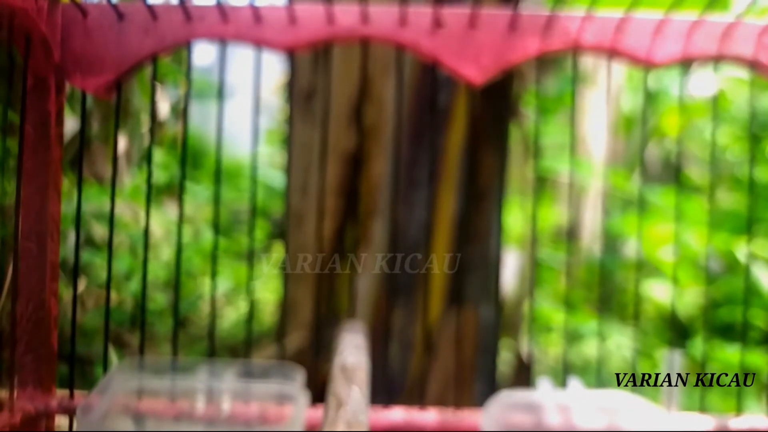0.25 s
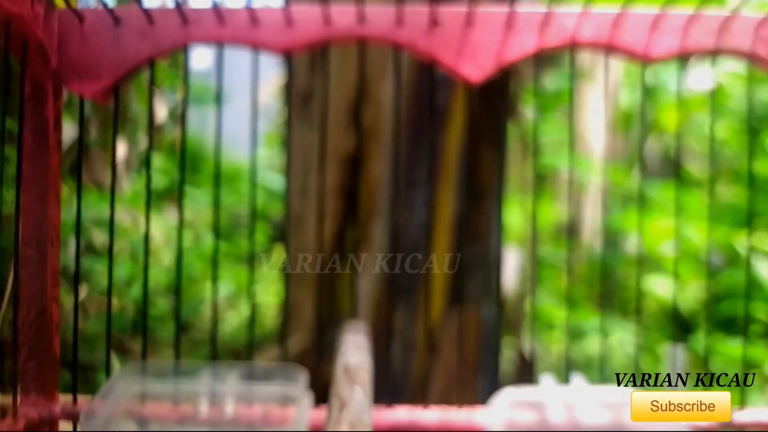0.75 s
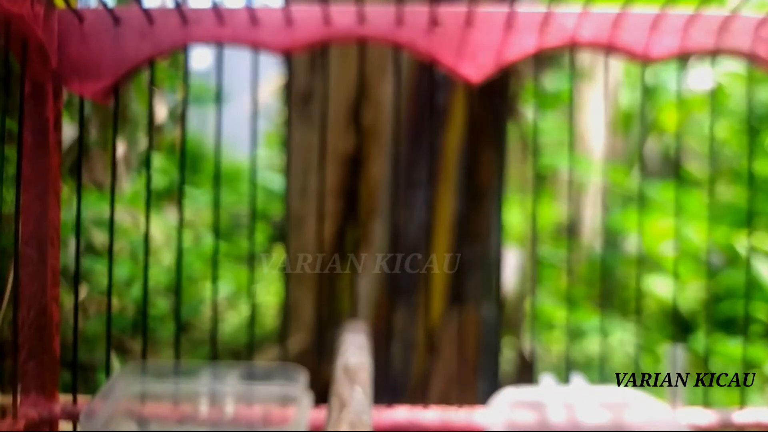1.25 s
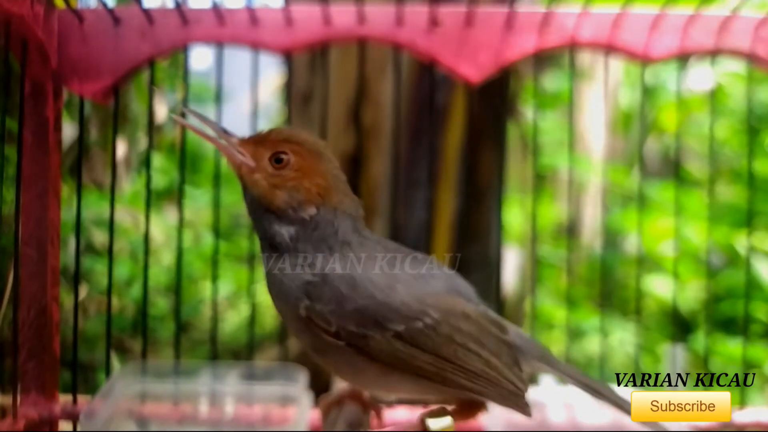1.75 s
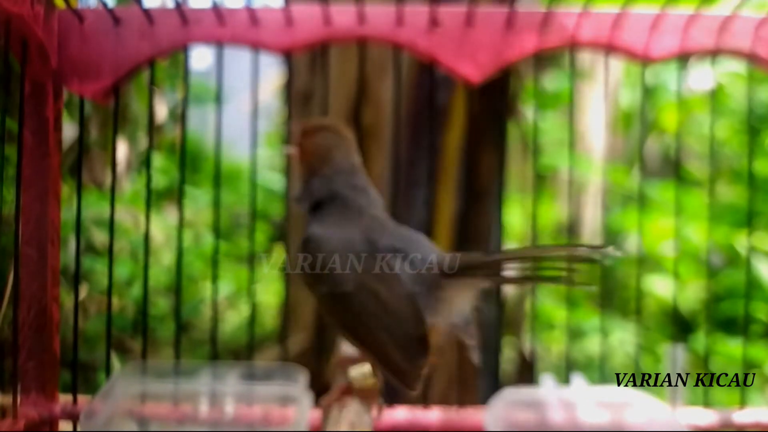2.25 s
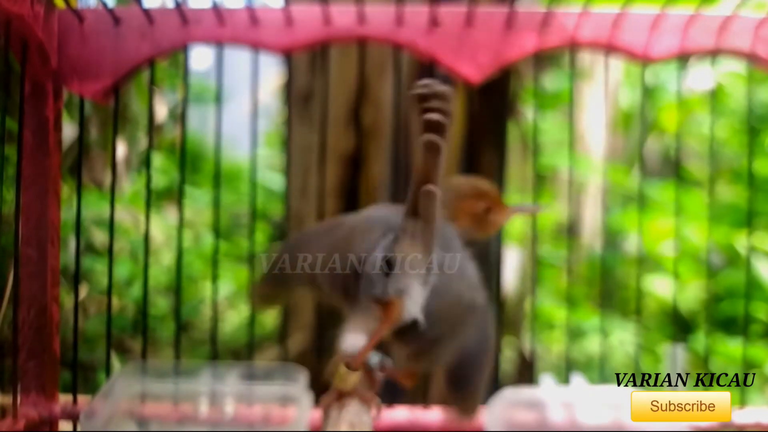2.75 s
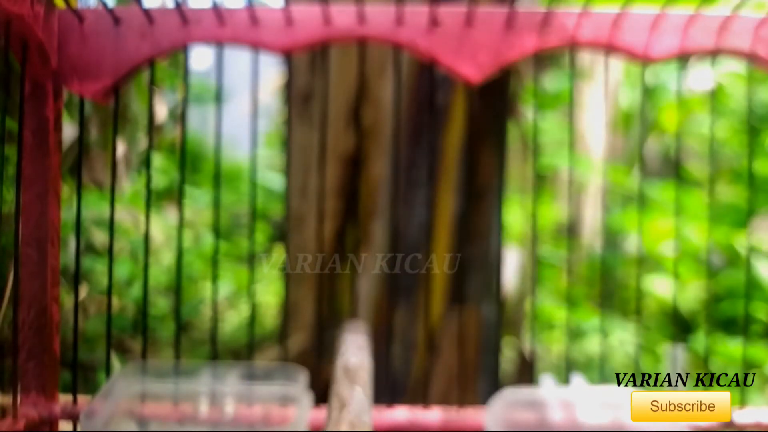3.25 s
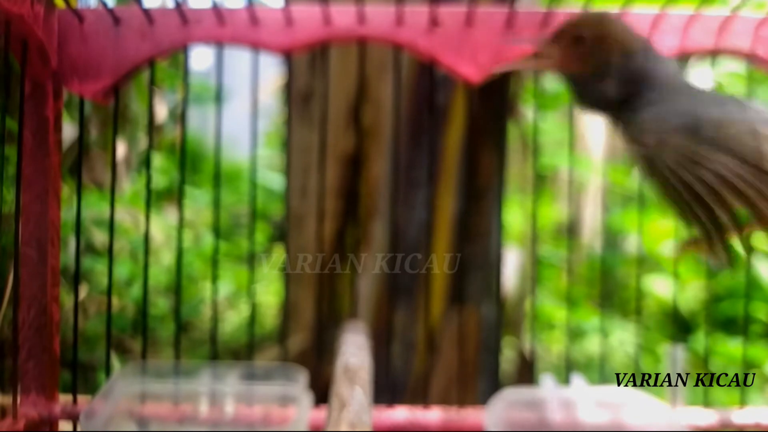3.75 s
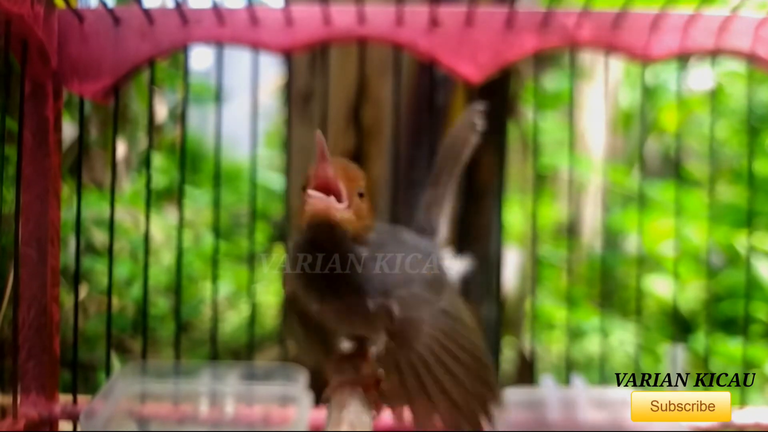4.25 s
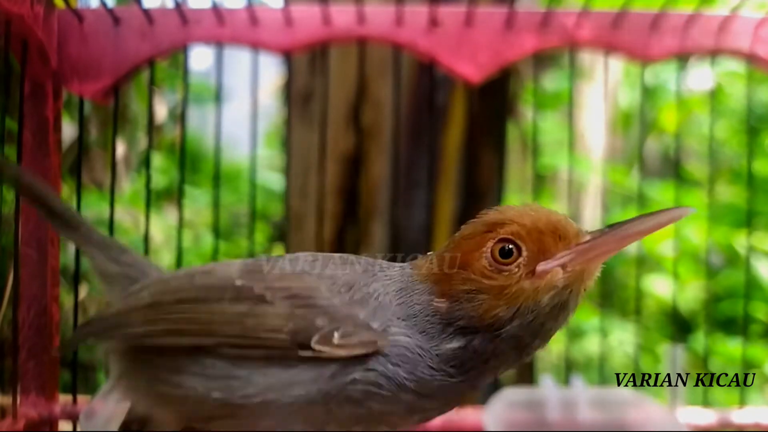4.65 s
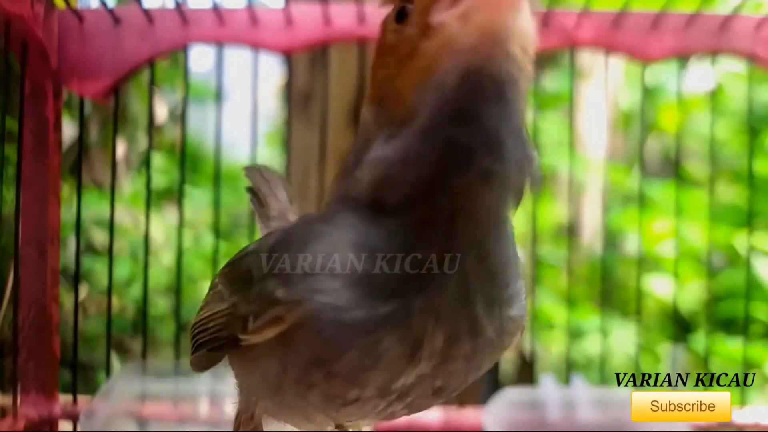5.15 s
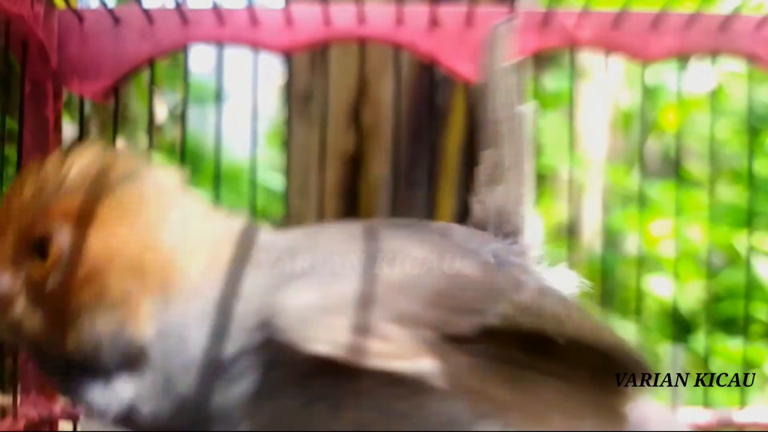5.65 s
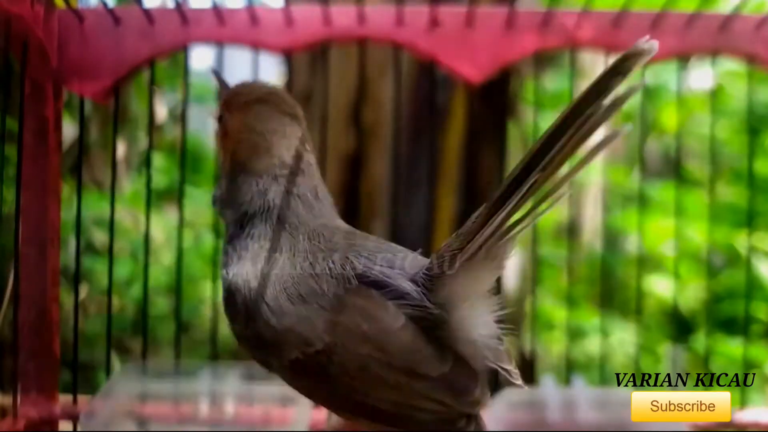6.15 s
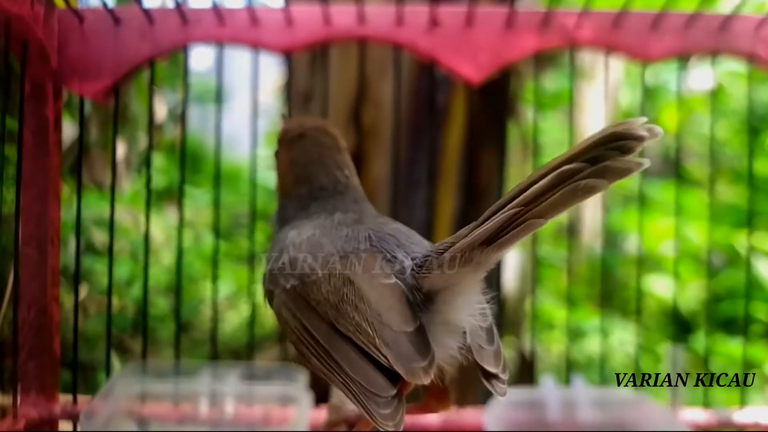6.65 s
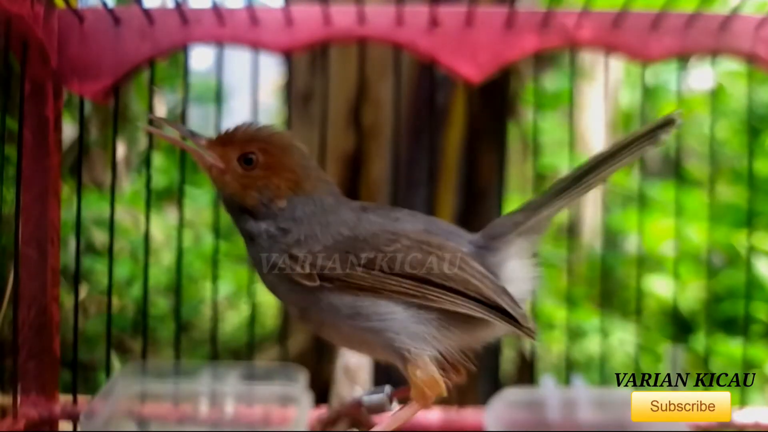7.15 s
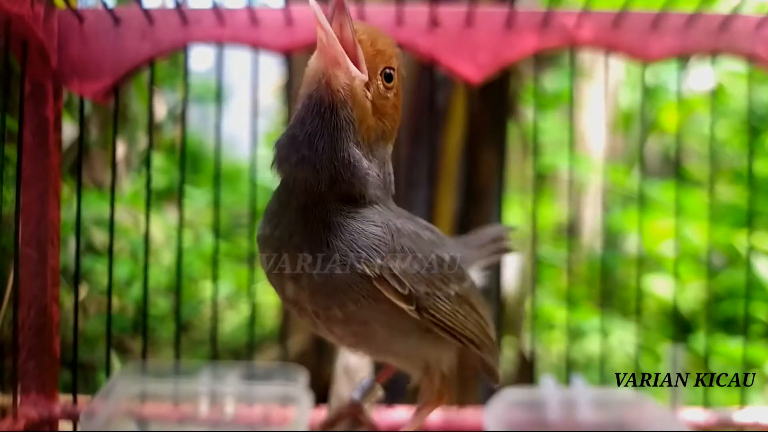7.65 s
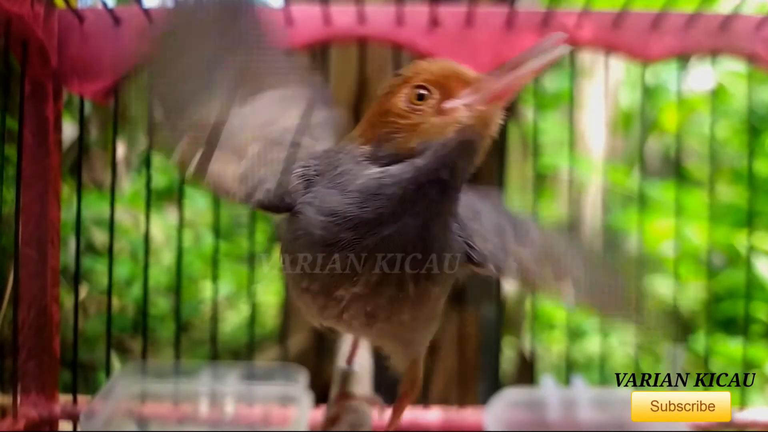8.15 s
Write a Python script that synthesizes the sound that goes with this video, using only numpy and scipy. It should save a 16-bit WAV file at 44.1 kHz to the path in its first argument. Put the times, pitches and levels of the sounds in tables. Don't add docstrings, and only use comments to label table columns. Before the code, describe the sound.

A small caged bird close by repeats a loud, piercing three-note whistle about once a second, while fainter birds answer over a low distant engine throb.

```python
import sys
import numpy as np
from scipy import signal
from scipy.fft import rfft, irfft, next_fast_len
from scipy.io import wavfile
from scipy.ndimage import uniform_filter1d, map_coordinates

SR = 44100
rng = np.random.default_rng(int(sys.argv[2]) if len(sys.argv) > 2 else 0)


def ratio(d):
    e = np.asarray(d, float) / 20
    return 10 ** e


def transcribe(signal):
    frames = np.atleast_2d(signal).T
    limited = np.clip(frames, -1, 1)
    pcm = np.round(limited * 32767).astype(np.int16)
    wavfile.write(sys.argv[1], SR, pcm)


N = 369999

# time_ms from the anchor, pitch_hz, level_db
RISE_SHAPE = [(-10, 1500, -40.5), (-6.5, 2040, -11), (-5.5, 2200, -7), (0, 2710, -4), (7, 3100, 1),
              (11, 3380, 4), (14.5, 3480, -3.5), (14, 5400, -42.5)]
WHISTLE_SHAPE = [(-12, 4500, -40.5), (-8, 4280, 2), (0, 3470, 3.5), (9.5, 2830, -7.5), (21, 2640, -8.5),
                 (40, 2825, -9), (93, 2908, -2.5), (169, 2922, -2.5), (182, 2760, -9)]
VEE_SHAPE = [(-8.5, 4800, -40), (-6.5, 4150, 5), (1, 2850, 1.5), (11.5, 1640, -12.5), (21.5, 1920, -10),
             (44.5, 2650, -0.46), (51, 2700, 0.5), (78.5, 1975, -10.5), (89.5, 1380, -29.5)]
# multiple of the pitch, level_db
OVERTONES_DB = [(2, -1.5), (3, -2.5), (4, -13.5), (5, -0.5)]
# multiple of the pitch, level_db
DOUBLING_DB = [(.5, -56), (1.5, -34.5), (2.5, -47), (3.5, -48), (4.5, -52.5)]


def unit(x):
    return x / np.sqrt(np.mean(x ** 2) + 1e-20)


def along(points, hz):
    f, v = np.transpose(points)
    return np.interp(np.log(hz + 1), np.log(f + 1), v)


def curves(rows):
    s, *cols = np.transpose(rows)
    return [np.interp(np.arange(N) / SR, s, c) for c in cols]


def wobble(rate, count=N):
    coarse = np.arange(0, count + 16, 16)
    knots = rng.standard_normal(int(count * rate / SR) + 5)
    return np.interp(np.arange(count), coarse, map_coordinates(knots, [coarse * rate / SR]))


def coloured(x, spectrum):
    m = next_fast_len(x.shape[-1] + 8192)
    gain = ratio(along(spectrum, np.fft.rfftfreq(m, 1 / SR)))
    return irfft(rfft(x, m) * gain, m)[..., :x.shape[-1]]


def pair(alike):
    a, b = rng.standard_normal((2, N))
    turn = np.arccos(np.clip(alike, -1, 1)) / 2
    return np.array([np.cos(turn) * a + np.sin(turn) * b, np.cos(turn) * a - np.sin(turn) * b])


def patchy(x, patchy_db):
    z = signal.stft(x, nperseg=512)[2]
    field = uniform_filter1d(rng.standard_normal(z.shape[1:]), size=5, axis=0)
    field = uniform_filter1d(field, size=9, axis=1)
    return unit(signal.istft(z * ratio(patchy_db * unit(field)), nperseg=512)[1][:, :N])


def add(track, s, sound):
    i = round(s * SR)
    part = sound[..., max(-i, 0):max(N - i, 0)]
    track[..., max(i, 0):max(i, 0) + part.shape[-1]] += part


def dip(t_ms, centre, half, db):
    return ratio(db * np.exp(-((t_ms - centre) / half) ** 2))


def note(shape, stretch, lead, over_db, waver_db=-0.16, overtones=OVERTONES_DB, halves=DOUBLING_DB,
         lag_ms=0.29, turn=0, release_ms=2.5):
    ms, hz, db = np.transpose(shape)
    ms = np.where(ms > 0, ms * stretch, ms)
    t = np.arange(ms[0], ms[-1], 1000 / SR)
    count = len(t)
    edges = np.clip(np.minimum((t - t[0]) / 2.5, (t[-1] - t) / release_ms), 0, 1)
    level = np.sin(edges * np.pi / 2) ** 2
    level = level * ratio(np.interp(t, ms, db) + waver_db * wobble(110, count))

    aim = uniform_filter1d(np.interp(t, ms, hz), size=90)
    pitch = aim * (1 + 0.0014 * wobble(120, count) + 0.003 * wobble(35, count))
    lead = lead - 2 * np.pi * (pitch - 2900) * lag_ms / 1000
    lead = lead + turn * (np.maximum(t, 45) - 110) / 1000
    phase = 2 * np.pi * np.cumsum(pitch) / SR + np.array([lead / 2, -lead / 2])

    over = 0
    for k, g in overtones:
        swell_db = 3 * wobble(18, count) + 1.5 * wobble(70, count)
        below_limit = np.clip((16000 - k * pitch) / 600, 0, 1)
        partial = np.sin(k * phase + 0.87 * wobble(320, count))
        over = over + ratio(g + over_db + swell_db) * below_limit * partial
    rough = 0.6 * wobble(190, count)
    half = 0
    for k, g in halves:
        half = half + ratio(g + 1.3 * wobble(70, count)) * np.sin(k * phase + rough)
    tone = level * (np.sin(phase) + np.sqrt(level) * (over + half))

    glide = np.abs(np.gradient(aim)) * SR * np.where(t < 120, 1, .6)
    glide = np.maximum(glide - 6000, 0) / 34000.0
    breath = np.sqrt(level) * edges * (.008 + np.minimum(glide, .6) ** 0.33)
    return tone, breath, ms[0] / 1000


def engine():
    # time_s, level_db, firings_per_s
    revs = [(0.0, -49, 19.0), (.3, -53.5, 18.8), (0.8, -55.5, 18.8), (1.05, -45, 20.3), (1.7, -48.5, 20.4),
            (2.05, -45.5, 20.5), (2.75, -51, 19.9), (3.0, -48.5, 20.3), (3.2, -53, 20.7), (3.9, -51, 21.2),
            (4.4, -55.5, 21), (5.0, -53, 23), (5.22, -48.5, 23), (5.7, -52, 20.4), (6.25, -48, 18.4),
            (6.6, -52, 18.4), (7.0, -47, 19.7), (8.39, -49, 20.9)]
    # freq_hz, level_db
    rumble_colour = [(12, -53), (20, -23), (53, -5), (119, -3), (147, -3.5), (219, -18.5), (291, -19.5),
                     (348, -23.5), (422, -31.5), (700, -33.5), (910, -66.5), (1540, -120)]
    pipe_hz, silencer_hz, silencer_db = 89, 119, -5
    throb = 0.53
    db, rate = curves(revs)
    cycles = np.cumsum(rate * (1 + 0.027 * wobble(11.0))) / SR
    fired = np.flatnonzero(np.diff(np.floor(cycles)))
    thumps, t = np.zeros((2, N)), np.arange(SR // 10) / SR
    silencer = ratio(silencer_db - 60 * t / 0.11) * np.sin(2 * np.pi * silencer_hz * t)
    for i, (size, turn, detune) in zip(fired, rng.standard_normal((200, 3))):
        side = 0.64 * turn * np.array([[1], [-1]])
        pipe = np.sin(2 * np.pi * pipe_hz * (1 + 0.045 * detune) * t + side)
        ring = ratio(-60 * t / 0.1) * pipe + silencer
        add(thumps, i / SR, ratio(2.0 * size) * (1 - np.exp(-t / .006)) * ring)
    rumble = unit(coloured(pair(1.0), rumble_colour))
    level = ratio(db + 1.1 * wobble(9.3) + [[1.8], [4.2]])
    return level * (np.sqrt(throb) * unit(thumps) + np.sqrt(1 - throb) * rumble)


def wings_and_yard():
    # start_s (middle), level_db over the leaves, half_length_s
    flurries = [(0.1, 5.5, 0.42), (0.957, 9.5, 0.056), (1.204, 3, 0.095), (2.067, 10.5, 0.044),
                (2.998, 10, 0.078), (3.598, 3.5, 0.16), (4.25, 0, 0.089), (4.824, 5.5, 0.16),
                (5.185, 10.5, 0.14), (5.827, 10, 0.13), (6.214, 6, 0.063), (7.299, 5, 0.32),
                (7.665, 4, 0.2), (8.146, 3.5, 0.29)]
    # freq_hz, level_db
    feathers = [(180, -33), (300, -7), (379, -8), (1480, -24), (1640, -30), (2070, -18), (10700, -21.5),
                (16000, -32)]
    # freq_hz, level_db
    yard = [(88, -30), (150, -3.5), (204, -16.5), (463, -26), (583, -33), (819, -25.5), (1410, -31),
            (2610, -30), (6000, -46), (7800, -77), (13200, -120)]
    leaves_db, yard_db = -77, -58.5
    t = np.arange(N) / SR
    db = leaves_db + sum(g * np.exp(-((t - s) / half) ** 2) for s, g, half in flurries)
    level = ratio(db + 11.0 + 2.2 * wobble(45) + 1.1 * wobble(5.5))
    rustle = level * patchy(coloured(pair(0.098), feathers), patchy_db=3.5)
    wash = ratio(yard_db + 0.5 + 0.83 * wobble(8.8)) * unit(coloured(pair(0.29), yard))
    return rustle + wash


def neighbour():
    # start_s of the whistle, rise_db, whistle_db, flourish_db, flourish_delay_s
    answers = [
        (-.205, -42, -63.5, -58, 0.23),
        (.812, -76, -64.5, -45.5, .25),
        (3.250, -51, -45, -52, 0.21),
        (4.688, -46.5, -46.5, -47, .226),
        (7.117, -52, -44.5, -55.5, 0.22),
    ]
    paces = [0.98, 0.94, 0.91, 0.67, .96]
    out = np.zeros((2, N))
    for (s, rise_db, whistle_db, vee_db, vee_s), pace in zip(answers, paces):
        # (centre ms, half width ms, dB)
        phrase = ((RISE_SHAPE, -.046, rise_db + 1.5, .89, (45, 22, 0)),
                  (WHISTLE_SHAPE, 0, whistle_db - 4, .92, (45, 22, -10)),
                  (VEE_SHAPE, vee_s, vee_db + 3, pace, (0, 12, -6)))
        for shape, late, db, stretch, hollow in phrase:
            tone, _, start = note(shape, stretch, lead=2.2, over_db=-27.5, waver_db=4.0,
                                  overtones=OVERTONES_DB[:1], halves=[])
            t_ms = 1000 * (start + np.arange(tone.shape[1]) / SR)
            add(out, s + late + start, ratio(db) * dip(t_ms, *hollow) * tone)
    return out


def triller():
    # start_s, peak_db
    chirps = [(0.195, -45.5), (0.25, -40), (1.1825, -42), (1.2201, -40), (3.4875, -34), (3.548, -32.5),
              (3.591, -39.5), (3.649, -35.5), (3.69, -35.5), (4.2282, -38), (4.28, -36.5), (4.3492, -37),
              (4.4004, -38.5), (4.469, -41), (4.9711, -32.5), (5.022, -35), (5.0772, -36.5), (5.125, -41),
              (5.1916, -42), (5.677, -45.5), (5.7453, -46), (7.344, -31.5), (7.3884, -33.5), (7.4465, -37),
              (7.504, -38.5), (7.554, -48.5), (7.6111, -36.5), (7.669, -41.5), (8.1793, -41), (8.2444, -45),
              (0.144, -48.5), (1.381, -35), (1.436, -31.5), (1.491, -38), (1.552, -40.5),
                  (3.754, -31.5), (3.865, -34.5), (3.925, -38.5), (3.987, -31.5), (4.042, -37),
                  (7.860, -34), (7.920, -33), (7.996, -40), (8.3063, -43)]
    # time_ms, pitch_share, level_db
    hook = [(-4, 1.8, -25.5), (-1.5, .91, -4), (4.5, 1.03, 4.5), (10, .985, 0), (14.5, 1, -8),
            (21, 0.25, -18.5), (23.5, 0.5, -32)]
    # start_s, opening pitch_hz
    bouts = [
        (0.099, 4510),
        (1.148, 4350),
        (3.45, 4480),
        (4.949, 4183),
        (7.3, 4185),
    ]
    rest_hz, settle_s = 3673, .42
    out = np.zeros((2, N))
    for s, db in chirps:
        since, hz = [row for row in bouts if row[0] < s][-1]
        pitch = rest_hz + (hz - rest_hz) * np.exp((since - s) / settle_s)
        pitch = pitch * rng.normal(1, 0.0089)
        hooked = [(ms, share * pitch, level + (ms > 12) * rng.normal(-5.5, 3)) for ms, share, level in hook]
        tone, _, start = note(hooked, rng.uniform(1.0, 1.2), lead=0.67, over_db=-23.5, waver_db=3.0,
                              overtones=OVERTONES_DB[:1], halves=[])
        add(out, s + start, ratio(db - 4.0) * tone)
    return out


def through_leaves(x):
    leaves = rng.standard_normal((2, 700)) * ratio(-20 - 60 * np.arange(700) / SR / 0.022)
    return 0.65 * x + signal.oaconvolve(x, leaves, axes=1)[:, :N]


def cage_paths():
    # start_s, left_delay_ms, left_share, right_delay_ms, right_share
    perches = [(0.2859, 2.06, 0.53, 3.03, 0.17), (1.2801, 0.34, 0.53, 1.287, -0.43),
               (2.2828, 0.25, 0.017, 0.27, 0.7), (3.7799, 1.87, -0.69, 2.51, 0.45),
               (5.2391, 0.25, -0.44, 0.12, -0.42), (6.3406, 0.53, -0.24, 0.7, -0.83),
               (7.7344, 0.46, 0.34, 0.49, -0.46)]
    tap = np.arange(900)
    paths = []
    for s, *reflection in perches:
        ms, share = np.reshape(reflection, (2, 2, 1)).transpose(1, 0, 2)
        scatter = (tap > 60) * ratio(-30.0 - 60 * tap / SR / 0.042) * rng.standard_normal((2, 900))
        paths.append((s, (tap == 0) + share * np.sinc(tap - ms * SR / 1000) + scatter))
    return paths


def singer():
    # time_ms, pitch_hz, level_db
    chip_shape = [(-5, 3100, -41), (-0.5, 3400, -2), (4.5, 3200, -3), (10, 1200, -48)]
    lead_in_shape = [(-4, 4050, -35.5), (-1, 4300, -5.5), (1, 4350, -3), (3.5, 3900, -31)]
    # start_s, stretch, left_db, right_db, left_lead_radians
    rises = [(0.2869, 0.73, -14.5, -4, -2), (1.2806, 0.83, -7.5, -4, -0.13), (2.2819, 1.05, -11, -7, 1.2),
             (3.7798, 1.1, -17, -6.5, 2.2), (5.2386, 1.01, -2, -0.5, 2.14), (6.3409, 0.82, -2, -5, -2.13),
             (7.734, 1.05, -2, -7.5, 4)]
    chips = [(2.3030, 0.88, -1.2, -5.5, -0.55)]
    lead_ins = [(7.7694, 0.95, -8.5, -5, 2)]
    whistles = [(0.3295, 1.048, -13, -3, -3), (1.324, 1, -7.5, -6, 0.06), (2.3381, .94, -4.5, -6, 0.51),
                (3.8229, 1.008, -8.5, -6.5, 0.65), (5.282, .99, -1, 0, 2.5), (6.3840, 1.003, -2.5, -9, 3),
                (7.782, 1.018, -2.5, -4, 2)]
    vees = [(0.577, 1.04, -13, -4, -1.63), (1.5699, 0.97, -8, -7, 6.5), (2.5777, 1.053, -8.5, -9, 0.73),
            (4.0672, 0.98, -6, -9, 4), (5.5305, 0.95, -3, -2.5, 2.5), (6.6428, 0.89, -4.5, -11.5, -2),
            (8.0353, 0.95, -2.5, -6.5, 2.5)]
    # start_s, held_pitch_hz, overtones_db, doubling_db, flourish_overtones_change_db
    phrases = [
        (0.28, 2946, -32.5, -2, -3),
        (1.27, 2944, -38.5, 0.3, -2.5),
        (2.27, 2929, -30.5, 0.5, -3),
        (3.77, 2928, -31, -3, -3),
        (5.23, 2926, -35, -1, -2),
        (6.33, 2916, -28.5, 1.5, 0.5),
        (7.72, 2917, -28.5, -1.5, -2.5),
    ]
    # left port farther by opening_ms, flourish_ms; turn_radians_per_s in the held note
    heads = [(0.24, .35, -2), (0.53, .72, 0.5), (0.37, 0.4, 5), (0.44, 0.24, 19), (0.29, 0.24, 4),
             (0.13, 0.22, -17), (0.21, 0.21, -4.5)]
    # whistle_left_db, whistle_right_db, flourish_left_db,
    # flourish_right_db
    dips_db = [(-0.5, -1.5, 2, -4.5), (-5.5, -1.5, -6.5, 0.1), (-8, -5.5, -1.5, 0.7),
               (3, -10.5, -9.5, -2.5), (0, 1, -9.5, -9.5), (1, 11, -1, 4.5), (-0.5, -0.5, -4, -6)]
    # centre_ms, half_width_ms
    dip_places = dict(whistle=(63, 13), vee=(15, 7.7))
    # left_db, right_db
    swells = [(1, 0.3), (-1.4, 0.5), (0.5, 0.5), (2, 0), (1.7, 0.6), (0.26, 0), (-0.5, 1.9)]
    # freq_hz, level_db
    breath_colour = [(300, -18.5), (1200, -15.5), (2500, -4), (4500, -8), (5200, -16.5), (9000, -10.5),
                     (13000, -19.5), (15500, -16)]
    linger_s = 0.0063
    song, puffs, paths = np.zeros((2, N)), np.zeros((2, N)), cage_paths()
    kinds = (("rise", RISE_SHAPE, rises), ("chip", chip_shape, chips), ("lead-in", lead_in_shape, lead_ins),
             ("whistle", WHISTLE_SHAPE, whistles), ("vee", VEE_SHAPE, vees))
    for kind, shape, rows in kinds:
        is_vee, is_whistle = kind == "vee", kind == "whistle"
        for s, stretch, left_db, right_db, lead in rows:
            k = sum(row[0] < s + .05 for row in phrases) - 1
            _, held_hz, over_db, half_db, vee_db = phrases[k]
            opening_ms, flourish_ms, turn = heads[k]
            tuned = np.multiply(shape, [1, held_hz / WHISTLE_SHAPE[-2][1], 1])
            tone, breath, start = note(
                tuned, stretch, lead, over_db + vee_db * is_vee, waver_db=.5,
                overtones=OVERTONES_DB[:2] if is_vee else OVERTONES_DB,
                halves=np.add(DOUBLING_DB, [0, half_db]),
                lag_ms=flourish_ms if is_vee else opening_ms, turn=turn * is_whistle,
                release_ms=16 if is_whistle else 3)
            count = tone.shape[1]
            t = start + np.arange(count) / SR
            if is_whistle or is_vee:
                drop_db = np.reshape(dips_db[k], (2, 2, 1))[int(is_vee)]
                tone = tone * dip(1000 * t, *dip_places[kind], drop_db)
            if is_whistle:
                held = np.clip((t - .12) / .05, -1, 1)
                unsteady = np.array([wobble(45, count), wobble(45, count)])
                tone = tone * ratio(np.reshape(swells[k], (2, 1)) * held + 0.68 * unsteady)
            _, path = min(paths, key=lambda spot: abs(s - spot[0] - .15))
            gain = ratio([[left_db], [right_db]])
            add(song, s + start, gain * signal.fftconvolve(tone, path, axes=1))
            add(puffs, s + start, gain * breath)
    keep = np.exp(-1 / (linger_s * SR))
    puffs = np.maximum(puffs, .7 * signal.lfilter([1 - keep], [1, -keep], puffs + 1e-9))
    hiss = patchy(coloured(pair(0.25), breath_colour), patchy_db=6.5)
    return song + ratio(-25.0 + 3.2 * wobble(200)) * puffs * hiss


def slaps(x):
    # delay_s, left_db, right_db
    echoes = [
        (.047, -38, -38),
        (.085, -39, -39.5),
        (.135, -46.5, -48),
    ]
    path = np.zeros((2, SR // 4))
    fade = np.hanning(2600) * ratio(-60 * np.arange(2600) / SR / 0.12)
    for s, left_db, right_db in echoes:
        blur = rng.standard_normal((2, 2600)) * fade
        blur = blur / np.linalg.norm(blur, axis=1, keepdims=True)
        path[:, round((s - .015) * SR):][:, :2600] += ratio([[left_db], [right_db]]) * blur
    return signal.oaconvolve(x.mean(axis=0)[None], path, axes=1)[:, :N]


def walls(x):
    # freq_hz, t60_s
    decay = [(500, 0.64), (2800, 0.26), (5000, 0.38), (12000, 0.024)]
    hz, t, z = signal.stft(rng.standard_normal((2, SR // 2)), SR, nperseg=256)
    tail = signal.istft(z * ratio(-60 * t / along(decay, hz)[:, None]), SR, nperseg=256)[1]
    late = np.pad(x, ((0, 0), (600, 0)))
    return signal.fftconvolve(late, tail / np.linalg.norm(tail[0]), axes=1)[:, :N]


def cage():
    # start_s, peak_db, ring_hz, thud_db
    ticks = [(0.9336, -46.5, 8970, -15), (2.8783, -52.5, 6000, -15), (2.9511, -52, 6010, -15),
             (4.751, -52, 9000, -15), (4.9056, -52, 6460, -15), (1.6898, -38, 2990, -21.5),
             (1.6965, -40.5, 3270, -8), (2.0482, -40, 2890, 2), (2.1638, -36.5, 5750, -23.5),
             (2.169, -25.5, 5610, -33), (2.1831, -20.5, 4040, -37), (2.1986, -20.5, 5540, -38.5),
             (2.2126, -29, 5820, -34.5), (2.2207, -23.5, 5670, -34), (2.989, -46, 7720, -2.5),
             (3.0235, -61, 3286, -9.5), (3.1083, -47.5, 6380, -19.5), (3.1579, -43.5, 5180, -23),
             (3.1715, -37.5, 7860, -17), (3.4429, -52, 3720, -3.5), (4.6054, -53, 4060, -9),
             (4.813, -45, 9000, -19.5), (5.1939, -53, 3840, -2), (5.8407, -45.5, 7470, 9.5),
             (5.9524, -45.5, 10500, -20), (6.2308, -21, 3900, -38), (6.2448, -14, 6200, -38),
             (6.2588, -12.5, 6270, -51), (6.2675, -32.5, 4750, -38.5), (6.2771, -30.5, 4700, -30),
             (7.4324, -39.5, 4070, -28)]
    # start_s, peak_db
    bumps = [
        (6.171, -23),
    ]
    # freq_hz, level_db
    bar_colour = [(1000, -20.5), (2000, -5), (4000, 2), (7000, 2), (9000, -10), (13000, -6.5),
                  (16000, -12.5)]
    out, thuds, t = np.zeros((2, N)), np.zeros((2, N)), np.arange(SR // 20) / SR
    hump = t / 0.00073 * np.exp(1 - t / 0.00091)
    thud = np.sin(2 * np.pi * 330 * t) * ratio(-60 * t / 0.012)
    for s, db, hz, thud_db in ticks:
        crack, scrape = rng.standard_normal((2, 2, len(t)))
        ring = 0.44 * np.sin(2 * np.pi * hz * t + rng.uniform(0, 2.7, (2, 1)))
        add(out, s, ratio(db - 2.5) * (hump * (0.89 * crack + ring) + 0.25 * scrape * ratio(-60 * t / 0.086)))
        add(thuds, s, ratio(db + thud_db + 1.0) * thud)
    for s, db in bumps:
        jolt = np.sin(2 * np.pi * 95 * t + 3 * (1 - np.exp(-t / 0.0023)))
        add(thuds, s + 0.0038, ratio(db + 2.5) * jolt * ratio(-60 * t / 0.073) * np.minimum(t / 0.0017, 1))
    return coloured(out, bar_colour) + thuds


def cock():
    # time_s, pitch_hz, level_db
    crow = [(2.3, 546.6, -94), (2.4, 540, -70), (2.8, 533, -76.5), (3.1, 499.5, -70), (3.5, 468.6, -73),
            (3.56, 431, -74), (3.8, 431, -73.5), (3.9, 424, -97)]
    # multiple of the pitch, level_db
    partials = [(2, -3), (3, -2), (4, 1.5)]
    hz, db = curves(crow)
    phase = 2 * np.pi * np.cumsum(hz * (1 + 0.02 * wobble(55))) / SR
    return sum(ratio(db + g + 1.7 * wobble(3.7) + 3.1 * wobble(50)) * np.sin(k * phase) for k, g in partials)


def dove():
    # time_s, pitch_hz, level_db
    coo = [(4.6, 525, -96.5), (4.7, 522, -68.5), (4.92, 519, -69.5), (5.02, 510, -96)]
    hz, db = curves(coo)
    phase = 2 * np.pi * np.cumsum(hz * (1 + 0.0094 * wobble(40))) / SR
    return ratio(db + 3 * wobble(30)) * np.sin(phase)


def ducking(bird):
    from_db, slope, window_s = -4.5, 3.4, 0.055
    power = uniform_filter1d(bird ** 2, size=int(window_s * SR), axis=1).max(axis=0)
    return ratio(-slope * np.clip(10 * np.log10(np.abs(power) + 1e-12) - from_db, 0, None))


def scene():
    background = engine() + wings_and_yard()
    far = through_leaves(neighbour() + triller()) + cock()
    bird, bars = singer(), cage()
    echo = walls(ratio(-30.5) * bird + ratio(-15.5) * far + ratio(-29.5) * bars)
    near = bird + bars + slaps(bird) + echo
    return near + far + dove() + ducking(bird) * background


def roll_off(x):
    return signal.sosfilt(signal.butter(12, 16640, fs=SR, output="sos"), x)


def record(dry):
    # freq_hz, level_db
    mic = [(12500, -0.5), (14800, 4), (15500, 4.5), (16100, -22), (16600, -69.5)]
    top, hard = .53, 9.0
    clipped = dry / (1 + np.abs(dry / top) ** hard) ** (1 / hard)
    return roll_off(coloured(clipped, mic))


dry = scene()
out = record(dry)
transcribe(out)
```